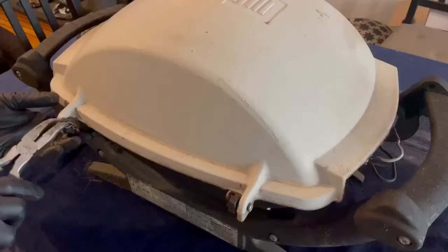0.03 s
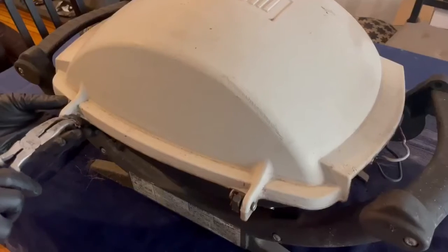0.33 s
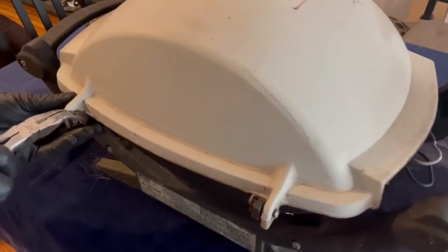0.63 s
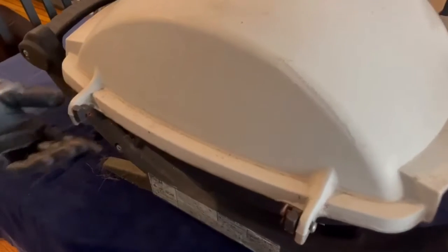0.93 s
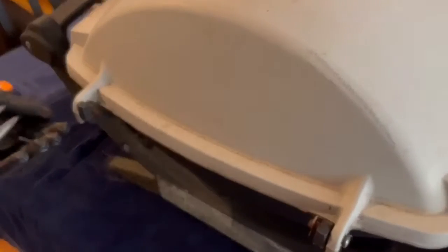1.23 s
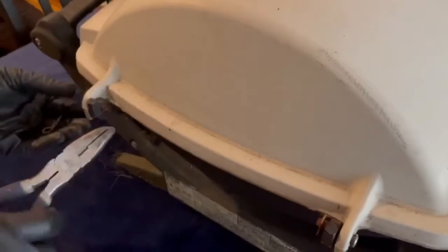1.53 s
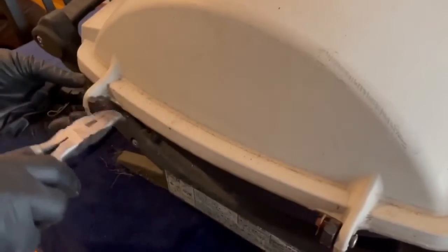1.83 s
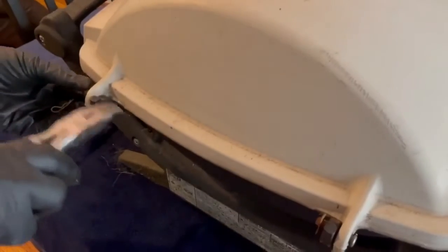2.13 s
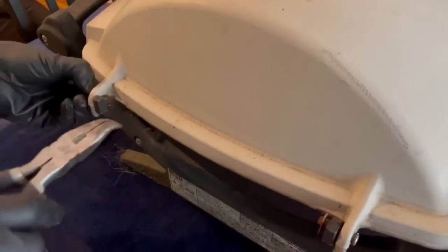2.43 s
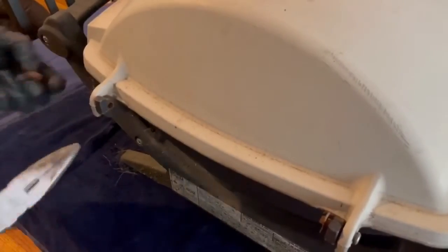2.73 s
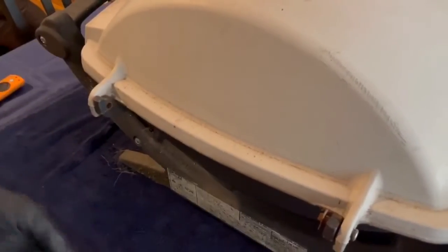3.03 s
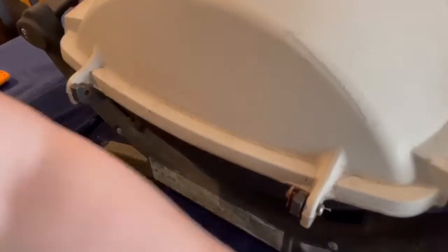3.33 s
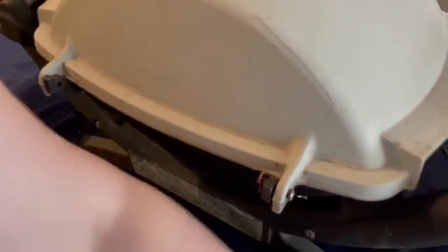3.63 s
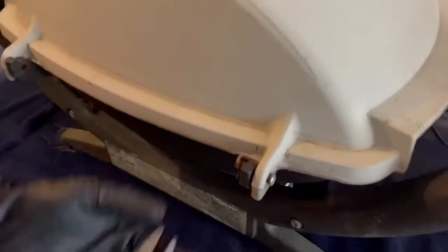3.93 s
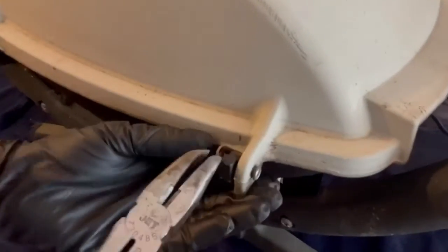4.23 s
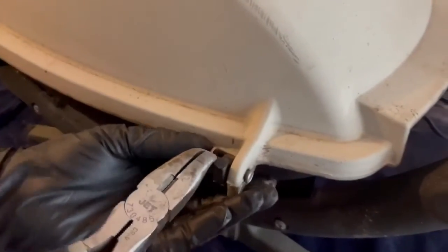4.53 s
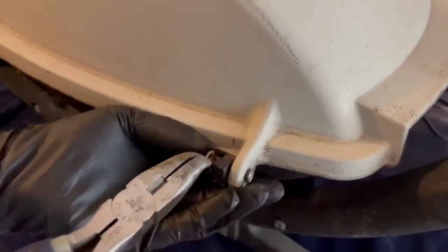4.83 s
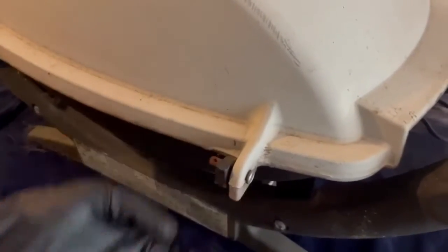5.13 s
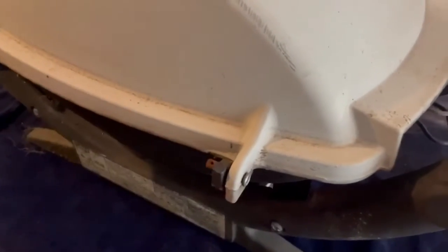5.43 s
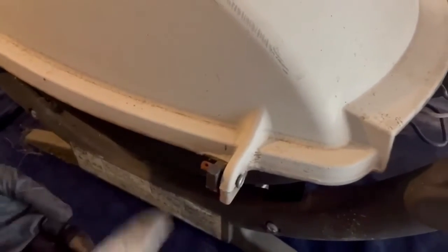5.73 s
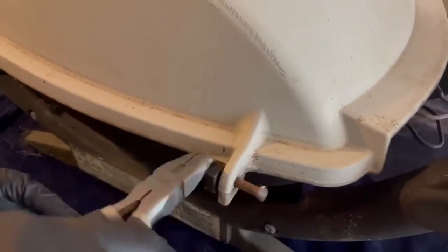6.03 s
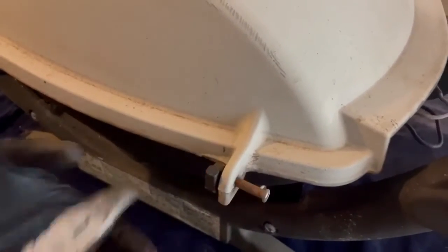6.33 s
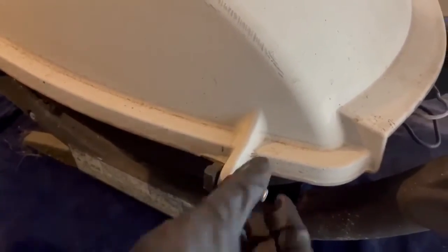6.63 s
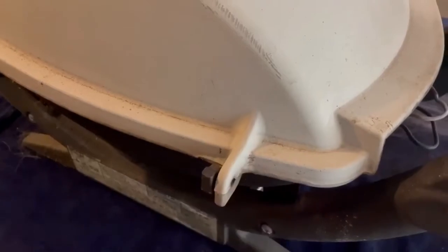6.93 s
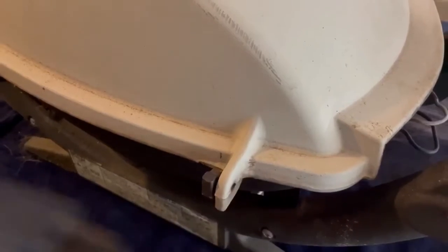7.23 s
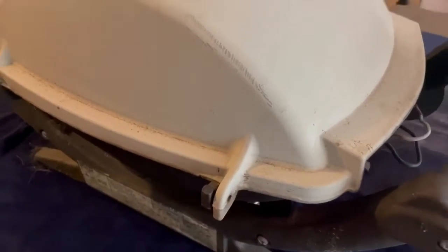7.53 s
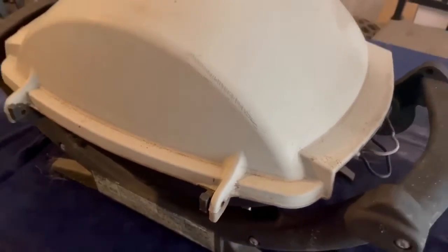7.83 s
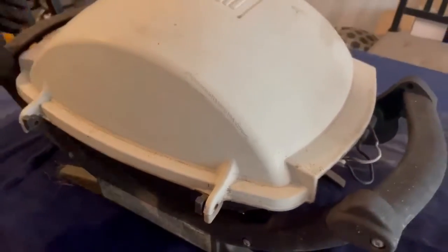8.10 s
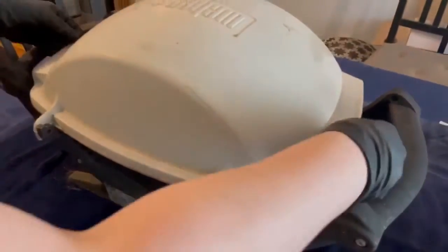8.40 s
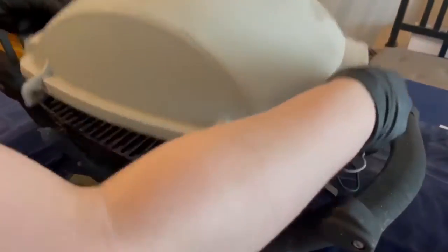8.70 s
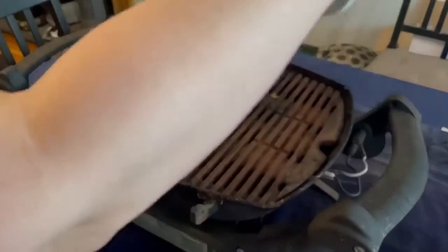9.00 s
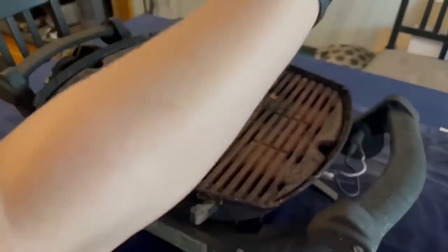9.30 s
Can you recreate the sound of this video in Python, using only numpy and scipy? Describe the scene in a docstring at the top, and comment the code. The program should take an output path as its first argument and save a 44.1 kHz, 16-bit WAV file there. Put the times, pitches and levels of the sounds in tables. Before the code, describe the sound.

Steel pliers skid, slip and crack against the hinges of a cast metal barbecue lid, each slip ringing briefly and knocking the hollow lid. The hits come in irregular clusters. A pin rasps out, followed by tiny ticks and rubber glove rustle. A hand thumps onto the handle, and the lid clangs on its base and drags off with faint squeaks. It is all heard close up in a quiet room.

```python
"""Pliers work the clips and pins out of the two hinges of a cast metal barbecue lid, close by.
The steel jaws skid, slip and crack on a hinge bracket, which rings and knocks the hollow lid.
A pin rasps out of its hole, and gloves tick and rustle. Then a hand thumps onto the handle
and the lid is lifted off, clanging on its base and dragging over it with faint squeaks.
Behind it all is the low rush of a quiet room."""
import sys
import numpy as np
from scipy import signal
from scipy.fft import rfft, irfft, next_fast_len
from scipy.io import wavfile

SR = 44100
rng = np.random.default_rng(int(sys.argv[2]) if len(sys.argv) > 2 else 0)


def inscribe(sig):
    """Save sig as 16-bit PCM at rate SR to the path in sys.argv[1].

    A 1-D sig is mono; a 2-D sig holds one channel per row.
    Samples are clipped to [-1, 1] before scaling.
    """
    pcm = np.round(np.clip(np.atleast_2d(sig).T, -1, 1) * 32767)
    wavfile.write(sys.argv[1], SR, pcm.astype(np.int16))


N = 421596
TIME = np.arange(N) / SR
AGE = np.arange(2 ** 14) / SR   # seconds since a contact
BLOW_S = .01   # every blow is scaled to the energy of a sound this long

# A mode is one tone an object rings at; t60 is the time it takes to fade by 60 dB.
# Levels in a table are relative: they set its rows against each other.
# The jaws slip and hit a hinge; the point of contact favours one pitch, the "bite":
# start_s, crack_db, hardness (0 to 1), bite_hz, knock_db, knock_pitch_hz
BLOWS = [(0.7453, -32, 0, 1210, -32, 320), (0.7479, -31.5, .05, 3450, -39, 320),
         (0.753, -22, 0.77, 5650, -24, 315), (1.73, -25.5, 0.82, 6140, -21, 375),
         (1.8949, -21.5, 0.79, 8850, -27, 277), (2.036, -17, 0.54, 5670, -12, 346),
         (2.0405, -19, 0.07, 5350, -33, 330), (2.182, -25.5, 0.07, 6000, -39, 327),
         (2.188, -16.5, 0.48, 2430, -19, 349), (2.464, -46.5, 0.7, 1070, -25, 352),
         (2.5725, -25.5, 0.75, 1130, -18, 307), (2.5777, -21.5, 0.81, 2020, -15, 304),
         (2.589, -27, 0.6, 1130, -22.5, 323), (2.597, -26, 0.4, 2140, -24.5, 327),
         (2.606, -31, 1, 1900, -23, 292), (2.612, -26, 0.8, 6100, -25.5, 313),
         (2.6174, -21.5, 0.9, 6450, -23, 295.7), (4.1884, -34, 0.24, 4500, -31.5, 330),
         (4.238, -49, 0.27, 4540, -33, 362), (4.409, -46.5, 0.43, 4260, -39.5, 278),
         (4.463, -44, 0.34, 2020, -36.5, 283), (4.805, -53.5, 0.44, 4540, -44, 280),
         (4.882, -32, 0.74, 6100, -55, 320), (4.8888, -19.5, 0.53, 1920, -35.5, 304),
         (5.8348, -20.5, 0.47, 2140, -12, 317), (5.8957, -37.5, 0.43, 950, -16.5, 337),
         (5.941, -49.5, .04, 4300, -49, 330), (6.0379, -28.5, 0.34, 1120, -26, 313),
         (6.0407, -19, 0.72, 4280, -19, 323), (6.051, -15.5, 0.63, 6200, -19.5, 345),
         (6.115, -31.5, 0.43, 1280, -22.5, 306), (6.2096, -15.5, 0.68, 4550, -13, 336)]
# Modes of the far hinge, then the near one with and without its clip: pitch_hz, width_hz, level_db
FAR_HINGE = [(931, 32, -5), (1940, 50, -2), (2185, 48, -1), (2330, 84, -1), (3170, 80, -8), (3500, 51, -3),
             (4660, 59, -7), (4930, 80, -8), (5190, 83, -5), (5430, 48, -5), (5910, 260, -3),
             (6430, 38, -5), (6720, 150, -5), (7490, 76, -7), (7790, 120, -9), (8450, 65, -9),
             (8830, 95, -11), (9520, 49, -14)]
NEAR_HINGE_CLIPPED = [(937, 33, -11), (1810, 30, -6), (2050, 90, -6), (2650, 54, -7), (3170, 30, -1),
                      (4200, 25, -4), (4610, 49, -11), (5020, 180, -7), (5840, 29, -8), (6330, 28, -7),
                      (6480, 27, -8), (7910, 36, -14), (8460, 83, -16)]
NEAR_HINGE_BARE = [(1150, 240, -4), (1410, 28, -3), (1897, 42, -2), (2310, 79, -7), (2910, 41, -2),
                   (3290, 34, -4), (3920, 73, -8), (4370, 78, -1), (5320, 35, -6), (5520, 30, -6),
                   (6000, 48, -1), (6260, 51, -9), (6730, 23, -10), (6980, 55, -4), (7260, 43, -4),
                   (7690, 100, -9), (8730, 41, -12), (9450, 32, -15)]
# The low, middle and high parts of a steel hit: frequency_hz, gain_db
CLANG_TONE = [(60, -66), (300, -30.5), (520, 5.5), (740, -12.5), (1000, 1.5), (1650, -5), (2250, -6),
              (2700, -1.5), (3600, -38)]
CRACK_TONE = [(1800, -27), (2900, 7.5), (4000, 7), (6000, 6), (7000, 0.5), (9000, -34)]
SIZZLE_TONE = [(5000, -33.5), (7200, 7), (9000, 3.5), (11200, 1), (12500, 2), (15000, -4), (17000, -24)]
# Modes of the hollow lid, the pliers and the lid's rim: pitch_hz, level_db, t60_s
LID_MODES = [(258, -3.5, 0.28), (289.7, -8, 0.24), (324, 0, 0.21), (349.3, -7.5, 0.05), (385, -0.5, 0.09),
             (440, -7.5, 0.17), (523, -3, 0.24)]
PLIER_MODES = [(1825, 0, 0.42), (2326, -8, 0.14), (3354, -6, 0.15), (4210, -4, 0.12), (5168, -14, 0.22),
               (5884, -5, 0.13)]
RIM_MODES = [(324, -4.5, .17), (520, -12, .2), (1412, 0, .085), (1604, -1, .11), (2005, -4, .19),
             (2310, -12, .1), (2850, -15, .07), (3140, -7, .08), (3311, -6, .085), (3424, -7, .06),
             (4060, -13, .09), (5012, -21, .07), (6788, -22, .08), (7127, -22, .08)]
# Blows that set the pliers ringing: start_s, level_db
PLIER_STRIKES = [(1.7315, -32.7), (2.037, -32.7), (2.189, -33.2)]
# Hand and pliers nudge the lid: start_s, knock_db, pitch_hz, click_db
NUDGES = [(0.097, -39.5, 310, -60.5), (0.131, -43, 350, -79), (0.26, -36.5, 387, -49),
          (0.454, -35.5, 413, -57), (0.731, -33, 320, -62), (0.78, -24, 272, -55), (2.309, -34.5, 320, -51),
          (2.416, -40, 343, -58), (2.669, -31.5, 287, -69), (2.906, -41.5, 246, -54),
          (3.019, -34.5, 218, -57), (4.272, -37.5, 303, -65), (4.962, -34, 284, -65),
          (5.029, -34, 258, -77.5), (8.598, -25.5, 300, -54)]
# The jaws skid before they grip or slip: middle_s, length_s, level_db
SKIDS = [(.128, 0.021, -51), (.268, 0.03, -51.5), (.405, 0.046, -51), (.465, 0.026, -45.5),
         (.742, 0.02, -39), (4.415, 0.057, -53)]
# Tight steel screeches, the dragged rim squeaks: middle_s, length_s, level_db, pitch_hz, glide_hz_per_s
SCREECHES = [(0.473, 0.011, -43.5, 1920, 0), (2.597, 0.0078, -18, 2185, -4), (2.624, 0.0092, -24, 3500, 3),
             (4.8852, 0.0058, -14.5, 6550, 140000)]
SQUEAKS = [(9.111, .009, -39.5, 1850, 0), (9.269, .018, -42.5, 1930, -4000), (9.298, .028, -48, 3520, 0),
           (9.303, .018, -50, 1900, 0), (9.336, .034, -47, 2650, 0), (9.385, .07, -54, 2610, -500),
           (9.42, .03, -52, 1950, 0), (9.435, .045, -54, 2850, 0), (9.47, .045, -51, 2550, 0),
           (9.48, .07, -54, 4240, 0), (9.507, .036, -42.5, 1985, 2000), (9.526, .012, -46, 4500, 0),
           (9.535, .03, -47.5, 2640, 0), (9.548, .028, -44.5, 2010, 0)]
# Small dry ticks: start_s, level_db, treble_db
TICKS = [(1.1204, -41, -8), (1.3187, -17.5, 28), (2.7477, -30.5, -7), (3.1568, -34, -31), (5.602, -24, 14),
         (6.4728, -10.5, -8), (6.4795, -26, -19), (6.625, -39, -5), (6.6722, -27, 12), (7.119, -41, -11),
         (7.378, -26.5, -3), (7.392, -32, -5), (7.407, -40, -11), (7.5568, -11.5, -5), (7.669, -29, -10),
         (7.6912, -24, -3), (8.088, -35.5, -16), (8.77, -32.5, -39)]
# Tone of a skid, a tick and the rubbing pin: frequency_hz, gain_db
SKID_TONE = [(400, -14), (1200, -2), (2500, -2.5), (5000, -8), (8000, -29), (12000, -10), (16000, -36)]
TICK_TONE = [(300, -18), (1500, -12), (3300, 2.5), (6000, 6.5), (9000, -2), (11000, 5), (13000, 4),
             (16000, -3)]
PIN_TONE = [(1200, -28), (2000, 3.5), (2800, 0), (4000, -18), (6000, -2), (9000, -16), (11200, -17),
            (12500, -35)]
# Modes of the sliding pin and the grazing rim: pitch_hz, width_hz, level_db
PIN_PEAKS = [(2185, 53, -12), (2350, 50, -5), (2650, 30, -22), (4090, 52, 2), (5030, 57, -5),
             (5600, 38, -5), (6160, 110, -12), (7700, 35, -4), (8166, 56, -18), (8750, 140, -2),
             (10860, 62, -14)]
GRAZE_PEAKS = [(1930, 170, 0), (2630, 39, -5), (2850, 21, -14), (3140, 29, -14), (3510, 32, -9),
               (3890, 67, -9), (4230, 45, -9), (4860, 38, -14), (5440, 100, -12), (5680, 50, -12),
               (6490, 250, -17), (7740, 51, -17)]
# The rim touches the base: start_s, level_db
RIM_TOUCHES = [(8.625, -22.5), (9.109, -32.5), (9.123, -44), (9.271, -35.5), (9.522, -39)]
# The dragged rim catches on grit: middle_s, length_s, level_db
DRAG_CATCHES = [(9.336, 0.031, -48), (9.413, 0.022, -49.5), (9.492, 0.045, -47.5), (9.525, .018, -47.5)]
# Tone of the rim rubbing, the rim hitting hard and the grit under it: frequency_hz, gain_db
RIM_RUB_TONE = [(60, -33), (400, -3), (1200, -0.5), (2000, -5.5), (3500, -7), (6000, -7), (10000, -9.5),
                (16000, -17)]
RIM_CLASH_TONE = [(150, -9), (450, 12), (900, 2), (2700, -1), (3400, -17), (4500, -16), (11000, -15),
                  (16000, -22)]
GRIT_TONE = [(500, -20), (2000, -32), (3800, 3), (7000, -3), (10000, -4), (13000, -4), (15000, -14)]
# The base thumps on the table, then the hand on the handle: start_s, level_db, pitch_hz, t60_s
THUMPS = [(1.914, -37, 115, .06), (5.84, -27, 123, 0.039), (6.212, -27, 60.2, 0.048),
          (8.042, -32.5, 163, 0.047), (8.045, -26, 105.2, 0.088), (8.085, -25.5, 142, 0.097),
          (8.091, -27, 325, .065), (8.108, -42.5, 233, .25), (8.15, -36, 125, 0.07),
          (8.165, -41.5, 95, 0.23)]
# Strokes of gloves and sleeves, and sweeps of the arm: middle_s, length_s, level_db
GLOVE_STROKES = [(0.3, 1, -68), (1.13, 0.17, -64), (3.01, 0.11, -54.5), (3.32, 0.07, -54.5),
                 (3.46, 0.23, -60.5), (4.13, 0.056, -58.5), (4.6, 0.066, -65), (5.06, 0.056, -56.5),
                 (6.44, 0.029, -43.5), (6.50, 0.097, -51), (7.455, 0.025, -45), (7.52, 0.14, -48.5),
                 (7.72, 0.11, -45), (8.39, 0.037, -55), (8.48, 0.081, -59)]
ARM_SWEEPS = [(3.58, 0.53, -51.5), (5.0, 0.32, -49.5)]
# Tone of the gloves, the arm, the room's echo and the room's air: frequency_hz, gain_db
GLOVE_TONE = [(500, -4.5), (2000, -12), (3500, -4.5), (7000, -6), (10000, -10), (13000, -10),
              (15000, -12.5)]
ARM_TONE = [(25, -36), (60, -9), (130, 10), (180, -14), (400, -10), (2000, -44)]
ECHO_TONE = [(60, -18), (300, 4), (520, -4.5), (900, -5), (2000, -2.5), (7000, -3), (11000, -5.5),
             (13000, -29), (16000, -6.5)]
AIR_TONE = [(15, -92), (25, -55), (84, -5), (137, 0), (157, -5.5), (285, -1), (394, -6.5), (463, -6.5),
            (1020, -6), (1520, -13.5), (1700, -14.5), (2160, -20.5), (6210, -29.5), (12200, -44.5),
            (16000, -76)]
# Faint steady hums in the air: pitch_hz, width_hz, level_db
AIR_HUMS = [(1038, 1.1, 7), (713, 24.5, -6.5), (4030, 75, -3.5)]
# How much the air differs between left and right: frequency_hz, side_minus_mid_db
AIR_WIDTH = [(60, -14.5), (110, -10), (200, -16), (380, -11.5), (700, -8), (1290, -5), (2380, 1),
             (4400, -3.5), (8120, -5), (15000, 2.5)]
# Timing between the microphone's two openings (ports): frequency_hz, left_lead_radians
PORT_PHASE = [(0, 0), (1800, .4), (2250, .8), (2550, 1.4), (2780, 5.2), (3100, 6.1), (4300, 6.9),
              (4900, 7.4), (5900, 6.6), (7500, 7.3), (8800, 5.5), (9900, 5.5), (11900, 3.3), (13200, 3),
              (14500, 2), (16600, .2)]
# Balance between the two ports: frequency_hz, left_minus_right_db
PORT_BALANCE = [(60, 1.5), (110, -2.5), (200, -1), (380, -1.7), (700, 3), (1290, 0.5), (2380, 1), (4400, 4),
                (8120, 2), (15000, 1)]


def hinge_blows():
    """The jaws crack on the hinge bracket; the heavy lid behind it knocks a moment later."""
    out, tones = np.zeros(N), steel_tones()
    knock_lag_s = .00183
    for s, crack_db, hardness, bite_hz, knock_db, pitch_hz in BLOWS:
        hit = bracket_hit(s, crack_db, hardness, knock_db, tones)
        add(out, s, bite(hit, bite_hz))
        knock = lid_knock(pitch_hz, reach_octaves=.36, push_db=11.5, push_t60=.061,
                          lowest_hz=250.7, thud_db=-23.5)
        add(out, s + knock_lag_s, from_db(knock_db) * knock)
    return out


def steel_tones():
    """Filters for the three parts of a steel hit: low clang, middle crack and high sizzle."""
    return colour(CLANG_TONE), colour(CRACK_TONE), colour(SIZZLE_TONE)


def bracket_hit(s, crack_db, hardness, knock_db, tones):
    """Steel hits a bracket: the harder the contact, the more sizzle and the less clang."""
    clang_tone, crack_tone, sizzle_tone = tones
    # a stronger knock on the lid also brings more clang
    clang_db = crack_db + np.interp(hardness, [0, 1], [7, -3.5]) + .26 * (knock_db - crack_db)
    sizzle_db = crack_db + np.interp(hardness, [0, 1], [-20.5, 2.5])
    near_hinge_s, clip_out_s = 3.6, 5.3
    hinge = FAR_HINGE if s < near_hinge_s else NEAR_HINGE_CLIPPED if s < clip_out_s else NEAR_HINGE_BARE
    low_ring, high_ring = bracket_ring(hinge, 0, 2800), bracket_ring(hinge, 2800, SR / 2)
    clang = burst(clang_tone, t60=.017, tail_db=-9, tail_t60=.11)
    crack = burst(crack_tone, t60=.027, tail_db=-16, tail_t60=.13)
    sizzle = burst(sizzle_tone, t60=.022, tail_db=-24, tail_t60=.16)
    low = from_db(clang_db - 3.5) * (clang + low_ring)
    middle = from_db(crack_db) * (from_db(-2) * crack + from_db(-3) * high_ring)
    return low + middle + from_db(sizzle_db) * sizzle


def bracket_ring(peaks, low_hz, high_hz):
    """The bracket's modes in one range; narrow ones ring longer, until the jaws damp them."""
    modes = [(hz, db + 10 * np.log10(width), ring_time(width, longest_s=.11))
             for hz, width, db in peaks if low_hz <= hz < high_hz]
    return unit_blow(sum(rng.choice([-1, 1]) * ringing([mode], scatter_db=2) for mode in modes))


def bite(hit, hz, lift_db=5.5, release_t60=.07):
    """While the jaws touch, they lift one pitch of the hinge; the energy stays the same."""
    favoured = signal.lfilter(*signal.iirpeak(hz, Q=6, fs=SR), hit)
    lifted = hit + (from_db(lift_db) - 1) * fade(release_t60) * favoured
    return lifted * np.std(hit) / np.std(lifted)


def lid_knock(pitch_hz, reach_octaves, push_db, push_t60, lowest_hz, thud_db):
    """A blow wakes the lid's modes near one pitch, and the mount gives way with a short push."""
    modes = [(hz, db - 10 * np.log10(1 + (np.log2(hz / pitch_hz) / reach_octaves) ** 4), t60)
             for hz, db, t60 in LID_MODES]
    push = from_db(push_db) * fade(push_t60) * np.sin(2 * np.pi * pitch_hz * AGE)
    knock = (ringing(modes, scatter_db=2) + push) * rise(.001)
    # the shell gives off little below its first mode; a weak thud comes through the table
    shell = filtered(knock, "high", lowest_hz, order=5)
    thud = filtered(crash(t60=.0463, tail_db=-8.5, tail_t60=.15), "band", [65, 170])
    return unit_blow(shell) + from_db(thud_db) * unit_blow(thud)


def nudges(rebound_s=.024, rebound_db=-5):
    """A soft push rocks the lid: a dull knock with a faint click, then a weaker knock back."""
    out, tones = np.zeros(N), steel_tones()
    for s, db, pitch_hz, click_db in NUDGES:
        add(out, s, bracket_hit(s, click_db, hardness=.71, knock_db=db, tones=tones))
        for delay, loss_db in ((0, 0), (rebound_s * rng.uniform(.89, 1.184), rebound_db)):
            knock = lid_knock(pitch_hz, reach_octaves=.29, push_db=4.5, push_t60=.084,
                              lowest_hz=200, thud_db=-20.5)
            add(out, s + delay, from_db(db + loss_db) * knock)
    return out


def skids():
    """Steel skids on steel in tiny slips that set the bracket ringing; a tight pull screeches."""
    bracket = colour(SKID_TONE, FAR_HINGE, peak_db=14)
    scrape = rms_one(through(slips(per_s=780, spread_db=.5), bracket))
    return swells(SKIDS) * scrape + squeals(SCREECHES, unsteady=.045, flutter_hz=900)


def plier_ring():
    """The steel jaws ring on after slipping off."""
    out = np.zeros(N)
    for s, db in PLIER_STRIKES:
        add(out, s, from_db(db) * unit_blow(ringing(PLIER_MODES, scatter_db=1)))
    return out


def ticks():
    """Tiny snaps that are too light to move the lid."""
    out, body, top = np.zeros(N), colour(TICK_TONE), colour(SIZZLE_TONE)
    for s, db, treble_db in TICKS:
        tone = unit_blow(body) + from_db(treble_db - 28) * unit_blow(top)
        add(out, s, from_db(db - 17) * burst(tone, t60=.0036, tail_db=-18, tail_t60=.017))
    return out


def pin_slide(start_s=6.76, attack_s=.019, hold_s=.007, t60=.074, slips_per_s=5000):
    """The pin rasps through its hole in one pull and rings, damped by the fingers that hold it."""
    age = TIME - start_s
    release = np.exp(-np.log(1000) * np.clip((age - attack_s - hold_s) / t60, 0, 2))
    pull = from_db(-31) * ramp(start_s, attack_s) * release
    rasp = slips(slips_per_s, spread_db=2.5) * pull / np.sqrt(slips_per_s / SR)
    modes = [(hz, db, ring_time(width, longest_s=.045)) for hz, width, db in PIN_PEAKS]
    ring = from_db(-3) * unit_blow(ringing(modes, scatter_db=.5))
    rub = from_db(-4) * unit_blow(colour(PIN_TONE))
    return through(rasp, ring + rub) / np.sqrt(BLOW_S * SR)


def lid_rim(clang_s=8.627, drag_s=9.245, drag_grows_db_per_s=1):
    """The lifted lid clangs on its base, scuffs at each touch and is then dragged in uneven spurts."""
    hits, rub = np.zeros(N), colour(RIM_RUB_TONE, GRAZE_PEAKS, peak_db=20)
    drag = ramp(drag_s, length_s=.025) * from_db(-57 + drag_grows_db_per_s * (TIME - drag_s))
    catches = swells(DRAG_CATCHES)
    graze_level = drag + from_db(-8) * catches
    scuff_db, scuff_rise_s, scuff_fall_s = -9.5, .01, .0058
    for s, db in RIM_TOUCHES:
        add(hits, s, from_db(db - 9) * burst(rub, t60=.029, tail_db=-9, tail_t60=.14))
        from_touch = np.maximum((s - TIME) / scuff_rise_s, (TIME - s) / scuff_fall_s)
        graze_level += from_db(db + scuff_db) * np.exp(-np.minimum(from_touch, 20))
    # only the first, hard touch sets the whole lid ringing
    clang = unit_blow(ringing(RIM_MODES, scatter_db=.5) * rise(.003))
    clash = burst(colour(RIM_CLASH_TONE), t60=.035, tail_db=-10, tail_t60=.1)
    add(hits, clang_s, from_db(-16) * clang + from_db(-23.5) * clash)
    graze = rubbing(rub, per_s=600, spread_db=3, flicker_db=3.5, flicker_hz=45)
    grit = rubbing(colour(GRIT_TONE), per_s=1200, spread_db=2.5, flicker_db=3, flicker_hz=25)
    grit_level = np.hypot(from_db(2) * drag, catches)
    return hits + graze_level * graze + grit_level * grit


def squeals(rows, unsteady, flutter_hz):
    """Metal sticks and slips in step with one mode for a moment, giving a wavering squeak."""
    waver = 1 + unsteady * wander(flutter_hz)
    out = np.zeros(N)
    for s, length, db, pitch_hz, glide in rows:
        near = np.abs(TIME - s) < 2 * length
        since = TIME[near] - s
        phase = 2 * np.pi * np.cumsum((pitch_hz + glide * since) * waver[near]) / SR
        out[near] += from_db(db) * .5 ** ((2 * since / length) ** 2) * np.sin(phase)
    return out


def thumps():
    """The jolted base and a gloved hand land softly: dull thumps that die quickly."""
    out = np.zeros(N)
    for s, db, hz, t60 in THUMPS:
        add(out, s, from_db(db + 6.5) * np.sin(2 * np.pi * hz * AGE) * fade(t60) * rise(.0021))
    return filtered(out, "high", 60)


def gloves(rest_db=-71):
    """Rubber and cloth crinkle with each stroke, never quite still; the moving arm rumbles faintly."""
    crinkle = rubbing(colour(GLOVE_TONE), per_s=4300, spread_db=2.5, flicker_db=3, flicker_hz=40)
    rumble = rms_one(through(rng.standard_normal(N), colour(ARM_TONE)))
    return np.hypot(swells(GLOVE_STROKES), from_db(rest_db)) * crinkle + swells(ARM_SWEEPS) * rumble


def room_echo(x, early_db, early_t60, late_db, late_t60):
    """Sound bounces quickly off the table and the base, then leaves a faint tail in the room."""
    shape = from_db(early_db) * unit_blow(fade(early_t60)) + from_db(late_db) * unit_blow(fade(late_t60))
    shape = np.pad(shape, (round(.003 * SR), 0)) / np.sqrt(BLOW_S * SR)   # starts 3 ms late
    sent = through(x, colour(ECHO_TONE))
    mid, side = [through(sent, white * shape) for white in rng.standard_normal((2, len(shape)))]
    # long waves reach both ports alike
    return mid + filtered(side, "high", 1100, order=1) * [[1], [-1]]


def room_air():
    """The steady low rush of the room, with a faint hum in it."""
    tone = colour(AIR_TONE, AIR_HUMS, peak_db=11.5)
    mid, side = [rms_one(through(white, tone)) for white in rng.standard_normal((2, N))]
    return from_db(-48) * (mid + through(side, colour(AIR_WIDTH)) * [[1], [-1]])


def ports(x):
    """The two microphone ports hear a near source with different timing and level."""
    size = next_fast_len(N + len(AGE))
    hz, spectrum = np.fft.rfftfreq(size, 1 / SR), rfft(x, size)
    tilt = from_db(at_hz(PORT_BALANCE, hz) / 2)
    turn = np.exp(-1j * np.interp(hz, *np.transpose(PORT_PHASE)))
    return irfft([spectrum * tilt, spectrum * turn / tilt], size)[:, :N]


def from_left(x, lag_s=.000281):
    """A source off to the left is a little duller and reaches the right port late."""
    dull = filtered(x, "low", 10300)
    return np.array([dull, np.interp(TIME - lag_s, TIME, dull)])


def ringing(modes, scatter_db):
    """A struck object rings as fading sine waves, each with a slightly random strength."""
    out = np.zeros(len(AGE))
    for hz, db, t60 in modes:
        age = AGE[:int(t60 * SR) + 1]
        strength = from_db(db + scatter_db * rng.standard_normal())
        out[:len(age)] += strength * np.exp(-np.log(1000) * age / t60) * np.sin(2 * np.pi * hz * age)
    return out


def ring_time(width_hz, longest_s):
    """The t60 of a mode: the narrower it is, the longer it rings, up to a limit."""
    return min(np.log(1000) / np.pi / width_hz, longest_s)


def crash(t60, tail_db, tail_t60):
    """Countless close modes of cast metal blur into noise: a quick crack and a weaker, longer tail."""
    decay = np.hypot(fade(t60), from_db(tail_db) * fade(tail_t60))
    return rng.standard_normal(len(AGE)) * rise(.0012) * decay


def burst(tone, t60, tail_db, tail_t60):
    """A crash with a given tone, scaled to one standard blow."""
    return unit_blow(through(crash(t60, tail_db, tail_t60), tone))


def slips(per_s, spread_db):
    """Friction as tiny random slips of uneven size."""
    sizes = from_db(spread_db * np.minimum(rng.exponential(1, N), 4)) * rng.choice([-1, 1], N)
    return sizes * (rng.random(N) < per_s / SR)


def rubbing(tone, per_s, spread_db, flicker_db, flicker_hz):
    """Rubbing catches and lets go, so its stream of slips flickers in level."""
    flicker = from_db(flicker_db * wander(flicker_hz))
    return rms_one(through(flicker * slips(per_s, spread_db), tone))


def wander(rate_hz):
    """A smooth random wobble with a typical size of 1."""
    return rms_one(filtered(rng.standard_normal(N), "low", rate_hz))


def swells(rows):
    """A smooth rise and fall for each row; its length is the width at half height."""
    powers = (from_db(db) ** 2 * .5 ** np.minimum(2 * (2 * (TIME - s) / length) ** 2, 60)
              for s, length, db in rows)
    return np.sqrt(sum(powers))


def colour(tone, peaks=(), peak_db=0):
    """A filter's answer to one click, made from a smooth tone curve with ringing peaks on it."""
    hz = np.fft.rfftfreq(len(AGE), 1 / SR)
    bumps = sum(from_db(db + peak_db) ** 2 / (1 + (2 * (hz - f) / width) ** 2) for f, width, db in peaks)
    cepstrum = irfft(np.log(from_db(at_hz(tone, hz)) * np.sqrt(1 + bumps)))
    # minimum phase: nothing sounds before the click
    cepstrum[1:] *= 2
    cepstrum[len(AGE) // 2:] = 0
    return irfft(np.exp(rfft(cepstrum)))


def at_hz(points, hz):
    """Read a curve between its points, on a log frequency scale."""
    knots, values = np.transpose(points)
    return np.interp(np.log(hz + 1), np.log(knots + 1), values)


def unit_blow(x):
    """Scale to a standard blow: the energy of BLOW_S seconds at an average (rms) level of 1."""
    return x / np.sqrt(np.sum(x ** 2) / (BLOW_S * SR) + 1e-20)


def rms_one(x):
    return x / np.sqrt(np.mean(x ** 2) + 1e-20)


def from_db(db):
    return 10 ** (np.asarray(db) / 20)


def rise(time_s):
    return 1 - np.exp(-AGE / time_s)


def fade(t60):
    return np.exp(-np.log(1000) * AGE / t60)


def ramp(start_s, length_s):
    return np.clip((TIME - start_s) / length_s, 0, 1)


def filtered(x, passes, hz, order=2):
    return signal.sosfilt(signal.butter(order, hz, passes, fs=SR, output="sos"), x)


def through(x, response):
    return signal.oaconvolve(x, response)[:len(x)]


def add(track, s, sound):
    start = round(s * SR)
    track[start:start + len(sound)] += sound[:N - start]


def scene():
    """All the work on the lid, heard through the two ports, with the room around it."""
    pin, snaps = pin_slide(), ticks()
    work = hinge_blows() + nudges() + skids() + plier_ring()
    work += lid_rim() + squeals(SQUEAKS, unsteady=.017, flutter_hz=300) + thumps() + gloves()
    aside = (TIME > 7.2) & (TIME < 7.95)   # the hand works off to the left
    direct = ports((work + snaps) * ~aside) + from_left((work + snaps) * aside)
    direct += ports(pin) * from_db([[1.3], [-1.3]])   # the pin is a little louder on the left
    sent = work + pin + from_db(-2) * snaps   # the ticks are so close that they bring less echo
    echo = room_echo(sent, early_db=-9, early_t60=.079, late_db=-19, late_t60=.4)
    return direct + echo + room_air()


def record(dry, top_hz=16400):
    """The sound fades in after a moment, peaks are rounded, and the deepest bass and the top are cut."""
    opened = dry * ramp(start_s=.072, length_s=.025)
    rounded = 1.1 * np.tanh(opened / 1.1)
    lean = filtered(rounded, "high", 42)
    return signal.sosfilt(signal.ellip(10, .2, 80, top_hz, fs=SR, output="sos"), lean)


dry = scene()
out = record(dry)
inscribe(out)
```